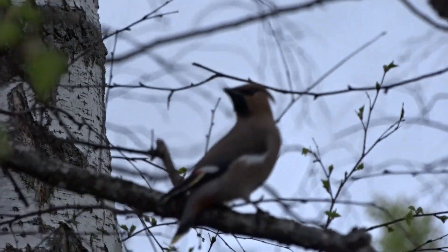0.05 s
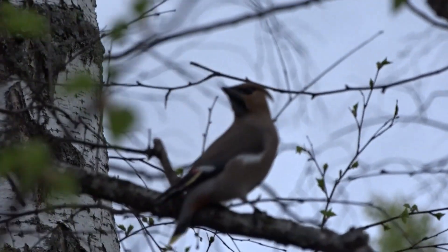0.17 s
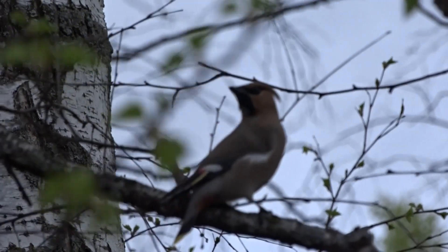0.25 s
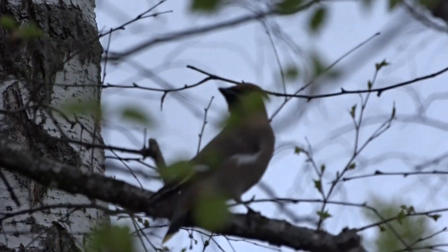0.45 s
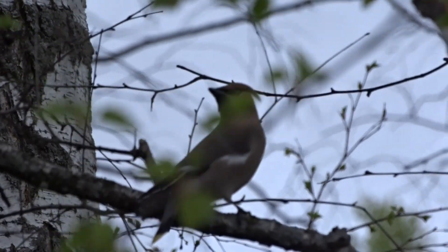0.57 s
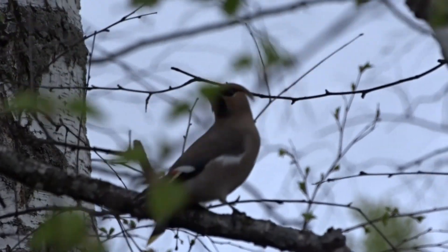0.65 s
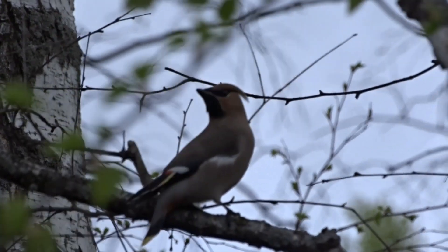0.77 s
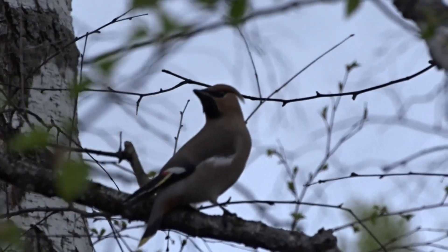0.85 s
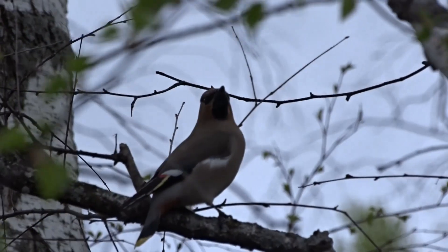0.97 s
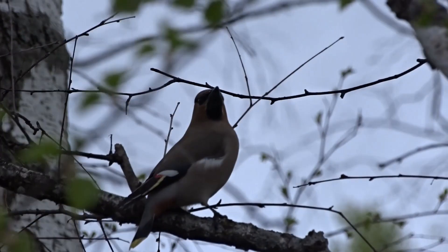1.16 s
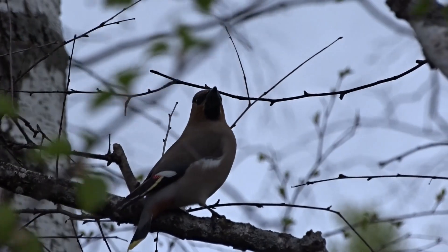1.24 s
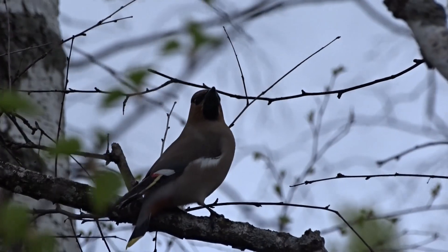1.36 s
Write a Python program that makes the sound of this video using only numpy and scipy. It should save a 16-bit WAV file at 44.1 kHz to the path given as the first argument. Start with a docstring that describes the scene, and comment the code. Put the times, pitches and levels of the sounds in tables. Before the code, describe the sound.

A waxwing repeats thin, high, trilled falling whistles outdoors after a low gust buffets the microphone.

```python
"""A distant rush and a fine hiss lie under everything, then a gust buffets the microphone ports as coloured noise
with eddy bursts and fluttering tones, and dull knocks ring. Far birds chip and buzz as gliding and vibrato sines.
From half a second a waxwing on a birch branch repeats a thin, falling whistle, trilled by chopping it into pulses.
Soft noise brushes and bright ticks pass close by early in its song; one more knock comes near the end.
The trees give all the bird notes a faint tail of decaying noise."""
import sys
import numpy as np
from scipy import signal
from scipy.fft import rfft, irfft, next_fast_len
from scipy.io import wavfile
from scipy.ndimage import map_coordinates

SR = 44100
rng = np.random.default_rng(int(sys.argv[2]) if len(sys.argv) > 2 else 0)


def int16_out(signal):
    """Quantize to a 16-bit WAV file."""
    q = np.round(np.clip(np.atleast_2d(signal).T, -1, 1) * 32767)
    wavfile.write(sys.argv[1], SR, q.astype(np.int16))


N = 61739  # length in samples


def amp(db):
    """Decibels to gain."""
    return 10 ** (np.asarray(db) / 20)


def unit(x):
    """Scale to rms 1."""
    return x / np.sqrt(np.mean(x ** 2) + 1e-20)


def clock():
    """The time of every sample in seconds."""
    return np.arange(N) / SR


def along(points, hz):
    """Read a curve of (f/Hz, value) points on a log frequency axis."""
    f, v = np.transpose(points)
    return np.interp(np.log(hz + 1), np.log(f + 1), v)


def wobble(rate):
    """A smooth random curve through rate knots a second."""
    knots = rng.standard_normal(int(N * rate / SR) + 4)
    return map_coordinates(knots, [clock() * rate])


def tone(hz):
    """A sine that follows a moving pitch."""
    return np.sin(2 * np.pi * np.cumsum(hz) / SR)


def filtered(x, response):
    """Shape the spectrum of x by a response of frequency."""
    m = next_fast_len(N + SR // 2)
    return irfft(rfft(x, m) * response(np.fft.rfftfreq(m, 1 / SR)), m)[..., :N]


def pan(db):
    """Left and right gains for a left-over-right level difference."""
    return amp([[db / 2], [-db / 2]])


def half_angle(likeness):
    """The mid-to-side mixing angle that gives a left-right likeness."""
    return np.arccos(np.clip(likeness, -1, 1)) / 2


def coloured_noise(spectrum, alike):
    """Stereo noise of rms 1, its colour and left-right likeness set by frequency."""
    def mid_side(hz):
        angle = half_angle(along(alike, hz))
        return amp(along(spectrum, hz)) * [np.cos(angle), np.sin(angle)]
    mid, side = filtered(rng.standard_normal((2, N)), mid_side)
    return unit(np.array([mid + side, mid - side]))


def swell(peak_s, width_s, db):
    """A bell-shaped envelope; the width is its standard deviation."""
    return amp(db) * np.exp(-.5 * ((clock() - peak_s) / width_s) ** 2)


TRILL_HZ, TRILL_DEPTH, PULSE_SHAPE, PULSE_SCATTER_DB = 138.73, 0.9871, 1.0854, 2
SWELL_DB, SWELL_SHARE, NOTE_RELEASE_S = 11, 0.4528, 0.013514  # share of the note spent swelling
PITCH_JITTER_HZ = 44.787
RASP_DB, RASP_ABOVE_HZ, RASP_JITTER_HZ = -16, 520, 169.57  # weak unsteady tone just above the whistle
WAXWING_PAN_DB, WAXWING_WET_DB = -2, -9.5
# waxwing notes [start t/s, length t/s, swelled level/dB, starting f/Hz, f it sinks towards/Hz, sinking t/s]
WAXWING_NOTES = [(0.5, 0.05343, -46.5, 6233, 6136, 0.02231), (0.657, 0.057904, -38, 6335, 5962, 0.019),
                 (.816, 0.06125, -36, 6950, 6043, 0.012637), (.990, 0.052194, -35.5, 6420, 6003, .016),
                 (1.143, 0.0728, -37, 7006, 5860, 0.018), (1.306, 0.06803, -32.5, 6650, 5768, .036)]


def waxwing():
    """A whistle with a faint rasp, chopped into fast pulses; each note swells as its pitch sinks, then stops."""
    out = np.zeros(N)
    for s, length, db, start_hz, end_hz, sink_s in WAXWING_NOTES:
        t = np.clip(clock() - s, 0, length)
        hz = end_hz + (start_hz - end_hz) * np.exp(-t / sink_s) + PITCH_JITTER_HZ * wobble(400)
        rasp_hz = hz + RASP_ABOVE_HZ + RASP_JITTER_HZ * wobble(600)
        voice = tone(hz) + amp(RASP_DB) * tone(rasp_hz)
        pulse = np.abs(np.sin(np.pi * TRILL_HZ * t)) ** PULSE_SHAPE
        trill = 1 - TRILL_DEPTH * (1 - pulse)
        still_to_swell = np.clip(1 - t / (SWELL_SHARE * length), 0, 1)
        level = db - SWELL_DB * still_to_swell + PULSE_SCATTER_DB * wobble(300)
        attack = np.clip(t / 0.00158, 0, 1)
        release = np.clip((length - t) / NOTE_RELEASE_S, 0, 1)
        out += amp(level) * attack * release * trill * voice
    return out * pan(WAXWING_PAN_DB) + amp(WAXWING_WET_DB) * trees(out)


CHIP_JITTER_HZ, CHIP_FLICKER_DB = 48.347, 3
# a far bird's steeply falling chips [start t/s, level/dB]
CHIP_TIMES = [(0.383, -55.5), (0.517, -50), (.646, -47.5), (0.781, -50), (0.92, -50.5), (1.041, -50)]
# the glide inside every chip [t/s, f/Hz, level added to the chip's/dB]
CHIP_GLIDE = [(0, 5420, -5), (.007, 5070, -5.5), (0.013, 4563, -6.5), (.021, 4413, -13.5),
              (.027, 3994, -4.5), (0.035, 3871, -0.5), (0.041, 3796, -7), (.048, 3864, -15)]
BUZZ_HZ, BUZZ_S, BUZZ_RATE_HZ, BUZZ_SWING_HZ = 3306.5, 0.03978, 145.05, 188.46
# another far bird's buzzy notes [start t/s, level/dB]
BUZZ_NOTES = [(.432, -56), (0.595, -49), (0.765, -52), (.927, -50), (1.247, -50)]
FAR_WET_DB = -8


def far_birds():
    """Two distant series: gliding sine chips, and short notes buzzing with a fast vibrato."""
    out = np.zeros(N)
    at, pitch, shape_db = np.transpose(CHIP_GLIDE)
    for s, db in CHIP_TIMES:
        t = clock() - s
        hz = np.interp(t, at, pitch) + CHIP_JITTER_HZ * wobble(200)
        level = db + np.interp(t, at, shape_db) + CHIP_FLICKER_DB * wobble(145.12)
        gate = (t > 0) * (t < at[-1])
        out += amp(level) * gate * tone(hz)
    for s, db in BUZZ_NOTES:
        t = np.clip(clock() - s, 0, BUZZ_S)
        vibrato = BUZZ_SWING_HZ * np.sin(2 * np.pi * BUZZ_RATE_HZ * t)
        hz = BUZZ_HZ + vibrato + 70 * wobble(300)
        out += amp(db) * np.sin(np.pi * t / BUZZ_S) * tone(hz)
    return out + amp(FAR_WET_DB) * trees(out)


TAIL_BUILD_S = 0.004864  # the scattered sound needs a moment to gather
TAIL_ALIKE = 0.9358  # left-right likeness
# how long the trees hold the sound [f/Hz, t60/s]
TREE_DECAY = [(2000, 0.761), (6000, 0.9196), (12000, 0.3344)]


def trees(x):
    """The diffuse stereo tail scattered back by trunks and branches: noise fading at its own rate per band."""
    hz, t, bins = signal.stft(rng.standard_normal((2, SR // 2)), SR, nperseg=256)
    build = 1 - np.exp(-t / TAIL_BUILD_S)
    decay = amp(-60 * t / along(TREE_DECAY, hz)[:, None])
    a, b = signal.istft(bins * build * decay, SR, nperseg=256)[1]
    angle = half_angle(TAIL_ALIKE)
    tail = np.cos(angle) * a + np.sin(angle) * np.array([b, -b])
    return signal.fftconvolve(x[None], tail / np.linalg.norm(tail[0]), axes=1)[:, :N]


RUMBLE_DB = -.5  # trim on the whole rumble
# the gust on the microphone [t/s, rumble level before the trim/dB]
GUST_LEVEL = [(0, -38), (.06, -35), (.09, -39.5), (0.119, -28.5), (.15, -39.5), (.21, -28.5), (.24, -21.5),
              (0.289, -16), (.315, -24.5), (.39, -16.5), (0.432, -24), (.462, -13.5), (.51, -19),
              (.54, -26), (.565, -19), (.615, -20), (.652, -36), (0.704, -27), (.77, -39), (.93, -40),
              (1.04, -29), (1.26, -38), (1.32, -33), (1.4, -27)]
# rumble colour [f/Hz, relative level/dB]
RUMBLE_COLOUR = [(15, -5), (30, -6), (55, 1.5), (95, -1), (170, -7.5), (260, -14.5), (500, -32),
                 (1200, -76)]
# rumble width [f/Hz, left-right likeness]
RUMBLE_LIKENESS = [(40, 1), (90, 0.6289), (160, 0.2387), (300, -0.1647)]
# sharp eddies in the gust [peak t/s, bell width t/s, level/dB]
EDDY_BURSTS = [(0.22, 0.01355, -29.5), (.275, 0.010831, -19.5), (0.316, 0.004428, -25),
               (0.34, 0.008036, -30), (0.413, 0.0115, -26), (0.447, 0.00502, -19.5), (0.466, 0.005512, -24),
               (0.503, 0.01457, -32.5)]
# eddy colour [f/Hz, relative level/dB]
EDDY_COLOUR = [(60, -16), (160, -2), (250, -1), (500, -11), (900, -17.5), (1500, -24), (2500, -58.5),
               (6000, -69.5)]
# eddy width [f/Hz, left-right likeness]
EDDY_LIKENESS = [(100, 0.361), (300, -.4), (700, -.3), (1500, -0.4944)]
FLUTTER_WANDER, FLUTTER_SPREAD = 0.0999, 0.8075  # share of the pitch, radians of wander at each port
# strong pushes that make the air at the ports flutter [peak t/s, bell width t/s, level/dB, centre f/Hz]
PORT_FLUTTERS = [(0.247, 0.01164, -9.5, 125), (0.272, 0.01667, -11, 165), (0.461, 0.011484, -13.5, 105)]


def wind():
    """A low rumble follows the gust; eddies burst brighter over it and the hardest pushes flutter."""
    s, db = np.transpose(GUST_LEVEL)
    rumble_level = RUMBLE_DB + np.interp(clock(), s, db)
    out = amp(rumble_level) * coloured_noise(RUMBLE_COLOUR, RUMBLE_LIKENESS)
    bursts = sum(swell(*eddy) for eddy in EDDY_BURSTS)
    out = out + bursts * coloured_noise(EDDY_COLOUR, EDDY_LIKENESS)
    for s, width, db, hz in PORT_FLUTTERS:
        wandering_hz = hz * (1 + FLUTTER_WANDER * wobble(120.49))
        phase = 2 * np.pi * np.cumsum(wandering_hz) / SR
        port_phase = FLUTTER_SPREAD * np.array([wobble(60.507), wobble(60.736)])
        out = out + swell(s, width, db) * np.sin(phase + port_phase)
    return out


# dull knocks of handling [start t/s, level/dB, ring f/Hz, t60/s, left over right level/dB]
HANDLING_KNOCKS = [(0.313, -15, 287.3, 0.02927, 12.5), (0.441, -15, 323, 0.03307, -1.5),
                   (1.309, -24.5, 453.5, 0.07366, -4)]


def knocks():
    """Dull bumps: decaying sines that ring for a few cycles."""
    out = np.zeros((2, N))
    for s, db, hz, t60, pan_db in HANDLING_KNOCKS:
        t = np.maximum(clock() - s, 0)
        attack = 1 - np.exp(-t / 0.000619)
        out += pan(pan_db) * amp(db - 60 * t / t60) * attack * np.sin(2 * np.pi * hz * t)
    return out


# soft brushes near the microphone [peak t/s, bell width t/s, level/dB]
BRUSH_SCUFFS = [(0.563, 0.010385, -41.5), (0.571, 0.00382, -34.5)]
# brush colour [f/Hz, relative level/dB]
BRUSH_COLOUR = [(300, -23), (1100, -8), (1400, 25.5), (1650, 6.5), (1950, 13), (3000, -9.5), (4500, -9),
                (6500, -2), (9000, -11.5), (14000, -6), (16000, -16)]
# width of brushes and ticks [f/Hz, left-right likeness]
BRUSH_LIKENESS = [(1500, 0.5526), (8000, 0.878)]
# tiny bright ticks [peak t/s, bell width t/s, level/dB]
BRIGHT_TICKS = [(.563, 0.0025705, -39), (.573, 0.00156, -52), (.626, 0.001762, -47.5), (.711, 0.00097, -51),
                (.828, 0.000673, -42.5), (.98, 0.01756, -51.5)]
# tick colour [f/Hz, relative level/dB]
TICK_COLOUR = [(1500, -35.5), (4000, -11), (6800, 6), (9000, -2.5), (14500, 2.5), (16000, -16)]


def brushes():
    """Brief soft scuffs and tiny bright ticks close by, each a bell-shaped burst of noise."""
    scuffs = sum(swell(*brush) for brush in BRUSH_SCUFFS)
    ticks = sum(swell(*tick) for tick in BRIGHT_TICKS)
    soft = scuffs * coloured_noise(BRUSH_COLOUR, BRUSH_LIKENESS)
    return soft + ticks * coloured_noise(TICK_COLOUR, BRUSH_LIKENESS)


RUSH_PAN_DB, HISS_DB = -2, -50.5
# drift of the distant rush [t/s, level/dB]
RUSH_DRIFT = [(0, -37.5), (.2, -38.5), (.55, -40.5), (.70, -41), (0.771, -38), (.92, -38.5), (1.081, -38),
              (1.25, -38), (1.4, -38)]
# rush colour [f/Hz, relative level/dB]
RUSH_COLOUR = [(25, 5), (150, -16.5), (230, -3.5), (420, -2), (750, -1.5), (1250, -6.5), (1560, -16.5),
               (2000, -16.5), (2700, -24.5), (5000, -36.5)]
# rush width [f/Hz, left-right likeness]
RUSH_LIKENESS = [(100, 1), (500, 0.8268), (1200, 0.5585), (2300, 0.3969)]
# hiss colour [f/Hz, relative level/dB]
HISS_COLOUR = [(500, 4.5), (2000, -2), (2700, -1), (3500, 1), (5000, -1), (6700, 3.5), (8400, -1.5),
               (10000, 1.5), (12000, -3), (15500, -6)]
# hiss width [f/Hz, left-right likeness]
HISS_LIKENESS = [(2300, 0.134), (3500, 0.2192), (4800, 0.5918), (7000, 1), (9500, 0.2175), (12000, 0.986),
                 (15000, 1)]
# hiss balance [f/Hz, left over right level/dB]
HISS_BALANCE = [(3000, -2), (7000, 0.5), (9800, -4.5), (12000, -0.3346)]


def air():
    """The slowly drifting far-off rush with a fine steady hiss on top, both coloured noise."""
    s, db = np.transpose(RUSH_DRIFT)
    drift = amp(np.interp(clock(), s, db))
    body = drift * pan(RUSH_PAN_DB) * coloured_noise(RUSH_COLOUR, RUSH_LIKENESS)
    hiss = coloured_noise(HISS_COLOUR, HISS_LIKENESS)
    hiss = filtered(hiss, lambda hz: amp(np.outer([.5, -.5], along(HISS_BALANCE, hz))))
    return body + amp(HISS_DB) * hiss


def scene():
    """Birds, wind, handling and background together."""
    return waxwing() + far_birds() + wind() + knocks() + brushes() + air()


TOP_HZ = 15780


def record(dry):
    """Keep only what lies below the band limit, with a sheer cut."""
    return filtered(dry, lambda hz: hz < TOP_HZ)


dry = scene()
out = record(dry)
int16_out(out)
```